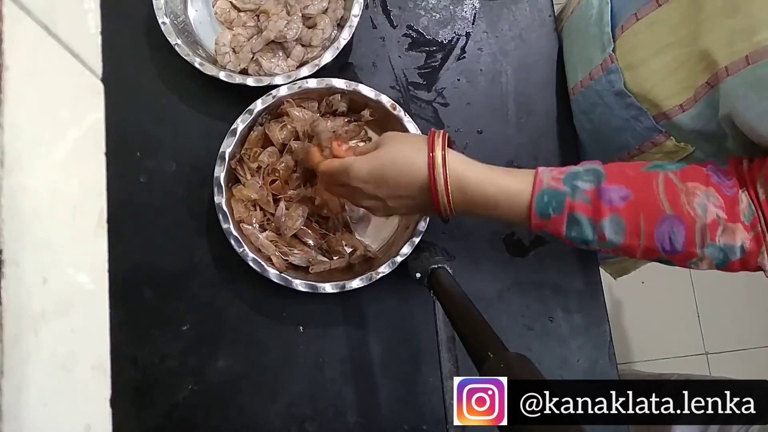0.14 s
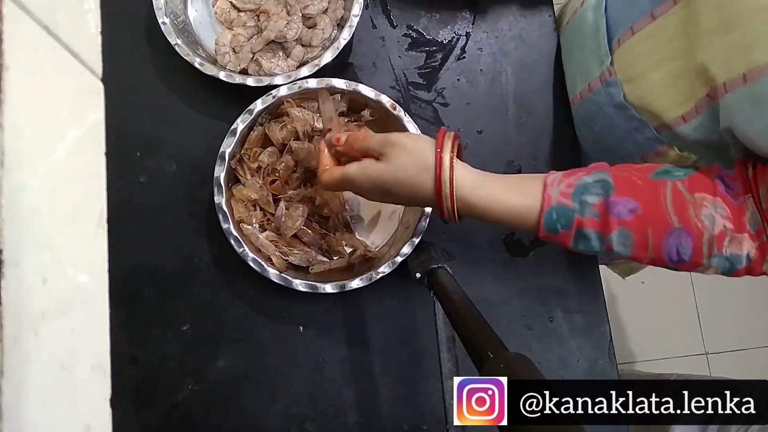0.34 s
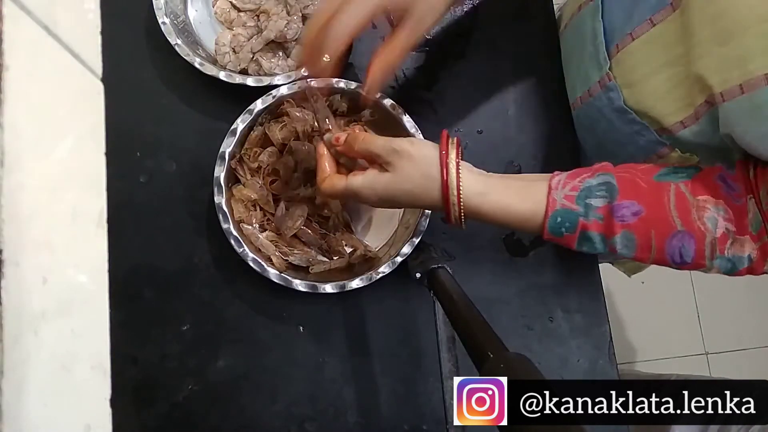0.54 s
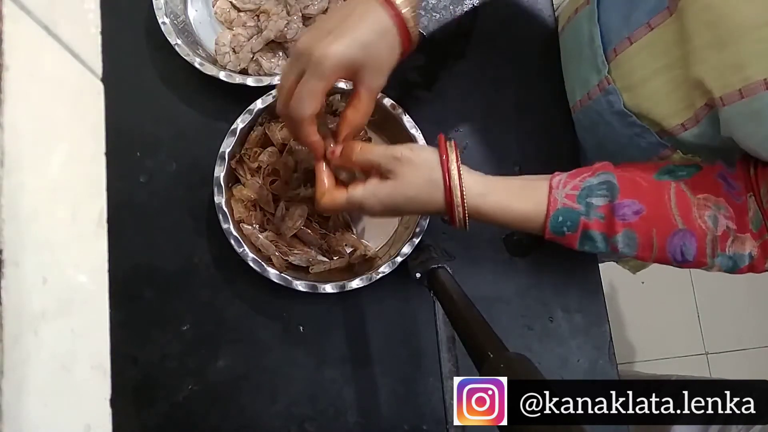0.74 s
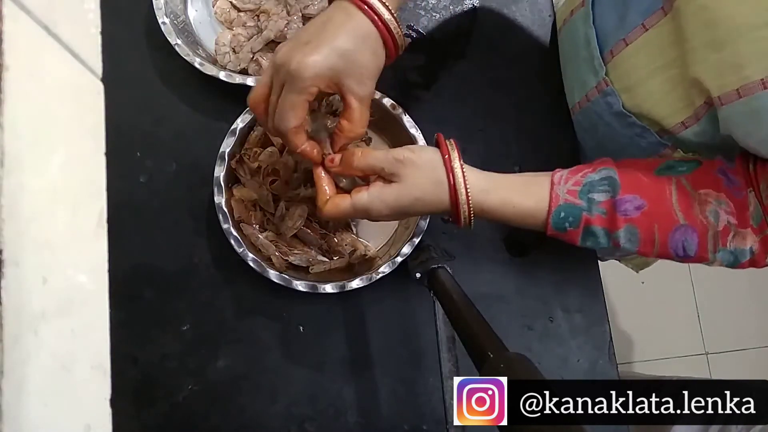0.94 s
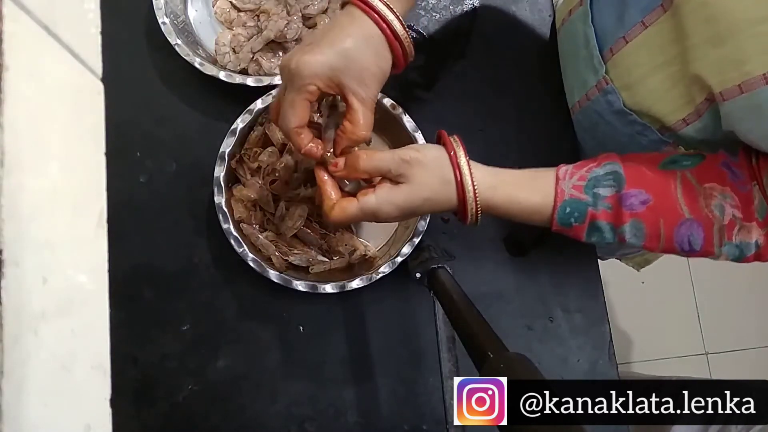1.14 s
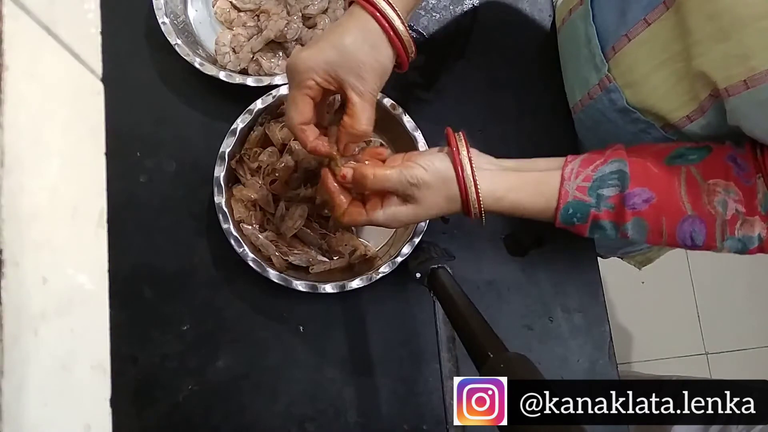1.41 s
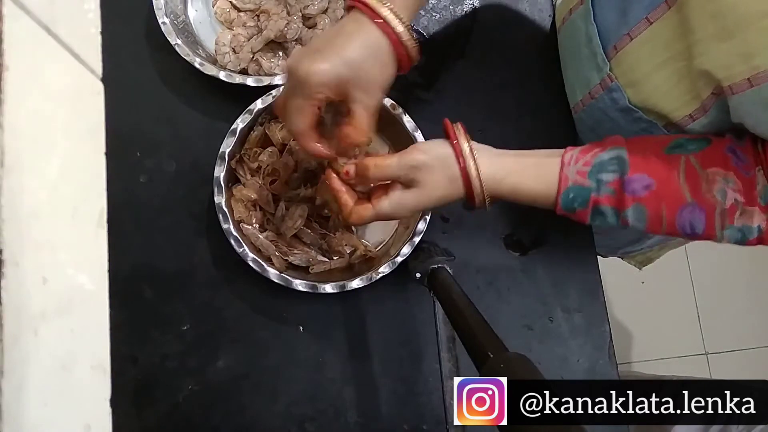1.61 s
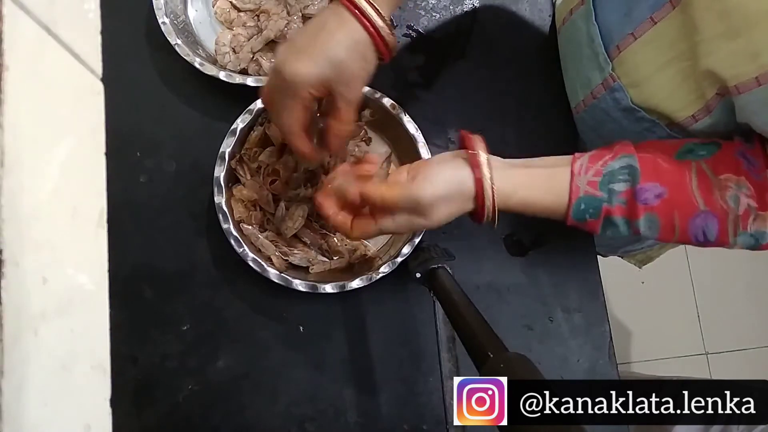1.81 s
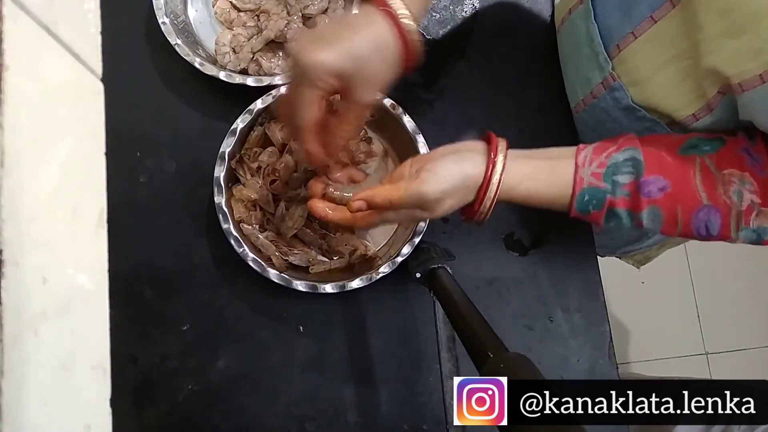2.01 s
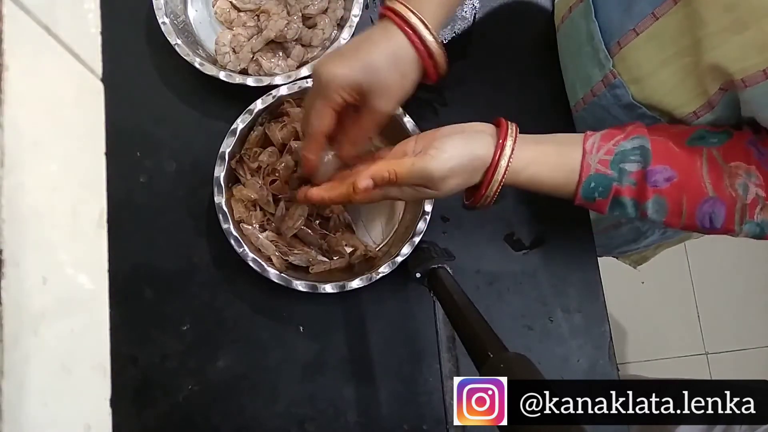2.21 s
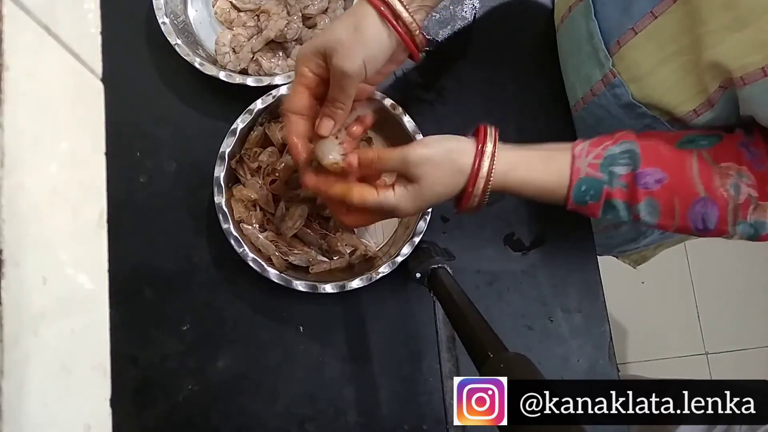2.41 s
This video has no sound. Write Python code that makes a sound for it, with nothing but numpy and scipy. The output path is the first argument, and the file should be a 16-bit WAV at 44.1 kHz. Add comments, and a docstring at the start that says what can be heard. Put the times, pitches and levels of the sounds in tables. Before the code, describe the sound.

Raw prawns peeled by hand, shells snapping and rubbing wetly as bangles clink and steel clanks once

```python
"""Raw prawns are peeled by hand over a steel pan in a hard-walled kitchen, while a motor hums and throbs.
Bangles clink on the wrists, steel clanks once, chatters and rings on, and a faint squeal rises far off.
Bangles clink again over a dull scuff; then come most shell snaps, amid wet rubbing, and a second squeal.
Late on a thin whine comes in, a bangle taps hard and the last clinks follow.
Contacts are bursts of tiny slips that tick and ring a body; the tones are sines, the air shaped noise."""
import sys
import numpy as np
from scipy import signal
from scipy.fft import rfft, irfft
from scipy.io import wavfile

SR = 44100
rng = np.random.default_rng(int(sys.argv[2]) if len(sys.argv) > 2 else 0)


def wrap_up_sound(samples):
    """Save the sound to the file named by the first command line argument, as 16-bit audio."""
    columns = np.atleast_2d(samples).T
    # keep every value between -1 and 1, then stretch to whole-number steps
    tamed = np.clip(columns, -1, 1)
    steps = np.round(tamed * 32767).astype(np.int16)
    wavfile.write(sys.argv[1], SR, steps)


N = 112454
T = np.arange(N) / SR

# Steel is struck and chatters: start_s, level_db, room_db (re direct), contact_s, tilt_db_per_octave
STEEL_BLOWS = [(0.2015, -6.5, 5.5, 0.0081, 0.5), (0.2105, -3.5, -3, 0.0092, 2.5),
               (0.226, -12, 2, 0.015, -1), (0.253, -22, 2, .003, -2), (0.287, -20.5, 7, 0.0027, 1.5),
               (0.312, -26, -2, .002, 2), (0.3371, -17.5, 0, 0.003, 2), (0.355, -29, 1, .003, 2),
               (0.397, -30, 0, .002, 2), (0.4224, -27.5, -2.5, 0.003, 3.5)]
# Loudness of wet shell rubbed between the fingers: time_s, level_db
RUB_LEVEL = [(0, -77), (.2, -74), (.5, -67), (.62, -73), (.9, -63), (.97, -76), (1.04, -54.5), (1.08, -64),
             (1.15, -78.5), (1.58, -89), (1.64, -71), (1.9, -69), (2.1, -61), (2.21, -65), (2.35, -63.5),
             (2.55, -57.5)]


def from_db(db):
    """Decibels to gain."""
    return 10 ** (np.asarray(db) / 20)


def rms_one(x):
    """Scale to rms 1."""
    return x / np.sqrt(np.mean(x ** 2) + 1e-20)


def energy_one(x):
    """Scale to energy 1."""
    return x / np.sqrt(np.sum(x ** 2) + 1e-20)


def in_time(rows):
    """The columns of a curve at every sample."""
    seconds, *columns = np.transpose(rows)
    return [np.interp(T, seconds, column) for column in columns]


def at_hz(points, hz):
    """Read a table on a log-frequency axis."""
    table_hz, values = np.transpose(points)
    return np.interp(np.log(np.maximum(hz, 1)), np.log(table_hz), values)


def pan(db):
    """Gains that lean to the left."""
    return from_db([[db], [-db]])


def drift(rate_hz):
    """Slow chance of spread 1: noise through two equal poles, made at a twentieth of the sample rate."""
    pole = np.exp(-40 * np.pi * rate_hz / SR)
    noise = rng.standard_normal(N // 20 + 2002)
    slow = signal.lfilter([1], [1, -2 * pole, pole * pole], noise)[2000:]  # drop the run-in
    return np.interp(np.arange(N) / 20, np.arange(len(slow)), rms_one(slow))


def tick(colour, size=2048):
    """The shortest causal click with this spectrum (minimum phase, by folding the cepstrum)."""
    level_db = at_hz(colour, np.fft.rfftfreq(size, 1 / SR))
    cepstrum = irfft(np.log(from_db(level_db)))
    cepstrum[1:size // 2] *= 2
    cepstrum[size // 2 + 1:] = 0
    return energy_one(irfft(np.exp(rfft(cepstrum))))


def slips(rate_per_s, spread_db, size):
    """Random tiny clicks of uneven strength and sign."""
    happens = rng.random(size) < rate_per_s / SR
    sign = rng.choice([-1, 1], size)
    strength_db = spread_db * np.minimum(rng.exponential(1, size), 3)
    return happens * sign * from_db(strength_db)


def body_ring(modes, t, tilt_db, detune):
    """A struck body's dying partials, each with a random phase and slightly uneven level and pitch."""
    mode_spread_db = 1.5
    ring = 0
    for hz, level_db, t60_s in modes:
        partial_db = level_db + tilt_db * np.log2(hz) + rng.normal(0, mode_spread_db)
        pitch_hz = hz * (1 + detune * rng.normal())
        partial = np.sin(2 * np.pi * (pitch_hz * t + rng.random()))
        ring = ring + from_db(partial_db - 60 * t / t60_s) * partial
    return ring


def contacts(events, colour, modes=(), ring_db=0, detune=0, slips_per_s=7000):
    """Each contact is a dying burst of slips that ticks and rings the body; gives direct sound and room feed."""
    slip_spread_db, rise_s = 3, 0.0005
    out, t = np.zeros((2, N + SR)), T[:SR // 2]
    for start_s, level_db, room_db, length_s, tilt_db in events:
        tilt_db = np.clip(tilt_db, -2.5, 3.5)  # keeps the tone from growing too dull or sharp
        click = tick([(hz, db + tilt_db * np.log2(hz)) for hz, db in colour])
        burst = slips(slips_per_s, slip_spread_db, len(t)) * (1 - np.exp(-t / rise_s))
        force = np.exp(-t / max(length_s, 1e-4))
        sound = energy_one(signal.fftconvolve(burst * force, click)[:len(t)])
        if len(modes):
            # the ring swells as the contact lets go
            ring = energy_one(body_ring(modes, t, tilt_db, detune) * (1 - force))
            sound = energy_one(sound + from_db(ring_db) * ring)
        start = int(start_s * SR)
        out[:, start:start + len(t)] += from_db([[level_db], [level_db + room_db]]) * sound
    return out[:, :N]


def shell_snaps():
    """Brittle shell tears in short bursts of slips, with no ring."""
    # Snaps: start_s, level_db, room_db (re direct), tear_s, tilt_db_per_octave
    snaps = [(0.5332, -39, -19, 0.0012, 5), (0.9018, -18, -2.5, 0.00087, -1),
             (0.9901, -16, -2, 0.0059, 3.5), (1.0288, -14, -6, 0.0005, 2), (1.0505, -16, -2, 0.003, -1.5),
             (1.2326, -25, 4, 0.0014, 0.5), (1.2765, -35.5, 3.5, 0.0012, 8), (1.9081, -40, 3, .002, 3.5),
             (1.9245, -25, 8, 0.0055, -5), (2.0617, -33.5, 4.5, 0.0048, -2.5),
             (2.124, -46, -26, 0.0037, -2)]
    # Spectrum of tearing shell: pitch_hz, level_db
    shell_colour = [(300, -13.5), (1200, -22), (2400, -14.5), (4000, -11.5), (6500, -8), (10000, 6),
                    (13000, 6.5), (15500, -8.5)]
    return contacts(snaps, shell_colour)


def rubbing():
    """Fine crackle of wet shell between the fingers: dense random slips under a wavering level."""
    # Spectrum of the crackle: pitch_hz, level_db
    rub_colour = [(500, -35), (2000, -5), (2800, -28.5), (4500, -17.5), (6300, -13), (8500, 4.5),
                  (11500, 10), (15500, -0.5)]
    crackles_per_s, crackle_spread_db = 1500, -5.5
    level_db, = in_time(RUB_LEVEL)
    gain = from_db(level_db + 2 * drift(37))
    crackle = signal.fftconvolve(slips(crackles_per_s, crackle_spread_db, N), tick(rub_colour))[:N]
    return gain * rms_one(crackle)


def squelch():
    """Tiny bubbles burst in the wet flesh as it is rubbed, each a dying sine at one of 24 pitches."""
    bubbles_per_s, spread_db = 110, 4  # the rate is for all pitches together
    below_rub_db, ring_cycles = -16.5, 150  # a bubble falls by 60 dB in these cycles
    level_db, = in_time(RUB_LEVEL)
    pitches_hz, t, out = np.geomspace(3000, 7500, 24), T[:SR // 10], 0
    for hz in pitches_hz:
        bubble = energy_one(from_db(-60 * t * hz / ring_cycles) * np.sin(2 * np.pi * hz * t))
        bursts = slips(bubbles_per_s / len(pitches_hz), spread_db, N)
        out = out + hz * signal.fftconvolve(bursts, bubble)[:N]  # higher bubbles are louder
    return from_db(level_db + below_rub_db) * rms_one(out)


def bangle_clinks():
    """Bangles touch and ring at pitches that differ a little each time."""
    # Clinks: start_s, level_db, room_db (re direct), contact_s, tilt_db_per_octave
    clinks = [(0.0383, -24, 7.5, 0.006, 3.5), (0.6654, -21.5, 8.5, 0.0097, 1.5),
              (0.6955, -9.5, 6.5, 0.0024, 3.5), (0.702, -6, -19, 0.021, 4.5),
              (0.731, -24, 9.5, 0.0061, 2.5), (1.3683, -30.5, 3.5, 0.0027, -1),
              (1.6192, -40, 9.5, 0.0082, 5), (1.6407, -34, 6, 0.0097, 10.5), (1.657, -30, -24, 0.0054, 16),
              (1.703, -27.5, 6, 0.0022, 2.5), (1.7709, -30, 3, 0.00068, 3.5), (1.8292, -30.5, 9, 0.0012, 6),
              (1.8447, -30, 1, 0.0033, -6), (2.2378, -17, 0.5, 0.0046, 4), (2.2578, -12, -2, 0.001, 0.5),
              (2.285, -26.5, 6, 0.0081, 9), (2.4872, -23.5, 6.5, 0.0022, 0.5), (2.5152, -24, 4, 0.0016, -6)]
    # Ringing modes of a bangle: pitch_hz, level_db, t60_s
    bangle_modes = [(4235, -7.5, 0.07), (5754, 2.5, 0.032), (8160, -5.5, 0.21), (11020, 8.5, 0.093),
                    (11000, 15.5, 0.036), (11800, 6.5, 0.016), (13200, 5.5, 0.11)]
    # Spectrum of the touch: pitch_hz, level_db
    bangle_colour = [(400, -42), (1000, -30), (3000, -37), (4300, -13.5), (5200, -11.5), (5800, -19.5),
                     (6500, -13), (8000, 2.5), (10000, 2.5), (11200, 12.5), (13000, 3.5), (14300, -6),
                     (15500, -11)]
    return contacts(clinks, bangle_colour, bangle_modes, ring_db=-4, detune=0.004)


def bangle_tap():
    """One hard tap of a bangle, in which the ring outweighs the touch."""
    # The tap: start_s, level_db, room_db (re direct), contact_s, tilt_db_per_octave
    taps = [(2.0178, -5, -9, 0.0034, 1)]
    # Modes that the tap rings: pitch_hz, level_db, t60_s
    tap_modes = [(4983, -32, 0.19), (5660, -24, .03), (9480, 0, 0.039), (10820, 7, 0.016),
                 (11030, 10.5, 0.022), (15050, 1, 0.018)]
    # Spectrum of the touch: pitch_hz, level_db
    tap_colour = [(1000, -26), (4000, -28), (5400, -22), (8400, -8.5), (9400, -7), (10000, -6), (11000, -4),
                  (12000, 3), (14000, -23), (15300, -22)]
    return contacts(taps, tap_colour, tap_modes, ring_db=11)


def steel_clank():
    """Blows and chatter on steel, as bursts of slips; the long ring is made apart."""
    # Spectrum of the blows: pitch_hz, level_db
    steel_colour = [(150, -15.5), (330, -3), (700, -12), (1300, -13), (2200, -11), (2600, -19), (3400, -26),
                    (4400, -17), (6000, -11), (8000, -3), (9700, 0), (12000, -3), (14000, -10),
                    (15500, -21)]
    return contacts(STEEL_BLOWS, steel_colour)


def steel_ring():
    """The steel rings on after the first blow; each partial has its own phase shift between the sides."""
    # Modes of the steel: pitch_hz, level_db, t60_s
    steel_modes = [(863, -48, 0.57), (1069, -55.5, 0.65), (1232, -60, 1), (1598, -44, 0.19),
                   (1917, -47.5, 0.71), (2068, -45, .35), (2164, -45, 0.37), (2184, -46, 0.51),
                   (2495, -51, 0.178), (2835, -52, 0.58), (2963, -40, 0.39), (3077, -36.5, 0.29),
                   (3655, -60.5, 0.59), (3790, -49.5, 0.6), (4016, -48.5, 0.21), (4395, -45, .22),
                   (4480, -43.5, 0.41), (4500, -42.5, 0.17), (4850, -47, 0.38), (5174, -48.5, 0.224),
                   (5240, -45, 0.41), (5660, -50, 0.17), (6280, -45, 0.098), (6400, -39, 0.094),
                   (6853, -40, .14), (7720, -37, 0.135), (8300, -40, .14), (9337, -29.5, .15),
                   (10100, -27, 0.079), (10100, -39.5, 0.45)]
    ring_db, pan_db, rise_s, side_phase_rad = 2, 2, 0.008, 1.2
    t = np.maximum(T - STEEL_BLOWS[0][0], 0)
    ring = 0
    for hz, level_db, t60_s in steel_modes:
        side_phase = side_phase_rad * rng.choice([-1, 1]) * np.array([[0], [1]])
        partial = np.sin(2 * np.pi * (hz * t + rng.random()) + side_phase)
        ring = ring + from_db(level_db - 60 * t / t60_s) * partial
    return from_db(ring_db) * pan(pan_db) * ring * (1 - np.exp(-t / rise_s))


def scuffs():
    """Something is shifted: sparse slips excite low modes whose pitches vary from scuff to scuff."""
    # Scuffs: start_s, level_db, room_db (re direct), length_s, tilt_db_per_octave
    shifts = [(0.674, -33, 11.5, 0.0094, 7), (0.688, -26, 6, 0.013, 0), (0.775, -23.5, 5.5, 0.0088, -2),
              (0.794, -31, -0.5, 0.017, -4.5), (0.826, -30, -3, 0.029, -2), (0.866, -35.5, 4, 0.0067, -2),
              (0.899, -28.5, 2.5, 0.006, -1), (1.926, -37.5, 0, 0.008, -3)]
    # Modes of the shifted thing: pitch_hz, level_db, t60_s
    scuff_modes = [(387, 2, 0.047), (611, -8.5, 0.22), (760.4, -1.5, 0.17), (896, -10.5, 0.086),
                   (1036, -1.5, 0.092), (2008, -2, 0.057)]
    # Spectrum of the scrape: pitch_hz, level_db
    scuff_colour = [(120, -6.5), (400, 1), (900, -3), (1500, -3), (2600, -6), (4000, -13.5), (8000, -18),
                    (15000, -10.5)]
    return contacts(shifts, scuff_colour, scuff_modes, ring_db=-6, detune=0.06, slips_per_s=1800)


def far_squeal():
    """A rough gliding tone with its octave; fast pitch jitter makes the roughness."""
    # Squeals: time_s, pitch_hz, level_db, octave_level_db
    squeal = [(0.02, 1350, -77.5, -88), (0.12, 1406, -79.5, -109), (0.18, 1546, -57.5, -87),
              (0.23, 1648, -82, -100), (0.46, 1816, -75, -100), (0.55, 1858, -68.5, -109),
              (0.66, 1806, -80, -104), (0.75, 1875, -100, -110), (1.215, 1198, -105, -105),
              (1.235, 1185, -70.5, -66.5), (1.35, 1276, -65.5, -76), (1.44, 1392, -59, -71.5),
              (1.51, 1385, -73.5, -78.5), (1.58, 1428, -70, -79.5), (1.68, 1439, -75, -98.5),
              (1.88, 1413, -83.5, -105), (2.0, 1406, -100, -110)]
    jitter_share, jitter_hz = 0.04, 260
    hz, level_db, octave_db = in_time(squeal)
    rough_hz = hz * (1 + jitter_share * drift(jitter_hz))
    phase = 2 * np.pi * np.cumsum(rough_hz) / SR
    return np.sqrt(2) * (from_db(level_db) * np.sin(phase) + from_db(octave_db) * np.sin(2 * phase))


def whine():
    """Two thin, high tones that waver in level and phase."""
    # The tones: pitch_hz, level_db (re the curve below)
    whine_tones = [(3450, 4), (3240, -5.5)]
    # Loudness of the whine: time_s, level_db
    whine_level = [(0, -115), (1.42, -110), (1.52, -94.5), (2.08, -81.5), (2.17, -83), (2.42, -82.5),
                   (2.55, -84)]
    waver_hz = 27
    level_db, = in_time(whine_level)
    out = 0
    for hz, db in whine_tones:
        waver = drift(waver_hz) + 1j * drift(waver_hz)
        out = out + from_db(level_db + db) * np.real(waver * np.exp(2j * np.pi * hz * T))
    return out


def motor():
    """A wavering hum and a higher tone that throbs about four times a second, swelling together."""
    # Steady hum tones: pitch_hz, level_db (before the swell), waver_share
    hum_tones = [(97.93, -54, 0.076), (157.3, -62, 0.22)]
    # Swell of the whole motor: time_s, level_db
    motor_swell = [(0, 5), (.6, -7.5), (1.0, 2.5), (1.2, 0), (1.6, 1), (2.0, 2), (2.55, -0.5)]
    throb_hz, throb_db = 220.2, -59  # level before the swell
    throb_period_s, throb_peak_s = 0.265, 1.58
    hum = 0
    for hz, level_db, waver_share in hum_tones:
        waver = 1 + waver_share * (drift(4.4) + 1j * drift(8.3))
        hum = hum + from_db(level_db) * np.real(waver * np.exp(2j * np.pi * hz * T))
    throb = np.cos(np.pi * (T - throb_peak_s) / throb_period_s) ** 4
    throb_tone = np.sin(2 * np.pi * throb_hz * T + drift(4.2))
    swell_db, = in_time(motor_swell)
    return np.sqrt(2) * from_db(swell_db) * (hum + from_db(throb_db) * throb * throb_tone)


def room_air():
    """Low rumble: shaped noise, alike at both sides in the bass."""
    # Spectrum of the rumble: pitch_hz, level_db
    air_colour = [(25, 2), (45, -9.5), (62, -7.5), (85, 6), (130, 5.5), (175, 0), (260, -9), (450, -12),
                  (700, -21), (1100, -31), (2000, -37.5), (2800, -52.5), (4000, -46.5), (8000, -55),
                  (16000, -62.5)]
    # Loudness of the rumble: time_s, level_db
    air_level = [(0, -54), (.55, -55.5), (.85, -50.5), (1.3, -53.5), (1.7, -50.5), (2.2, -54), (2.55, -59)]
    # Left-right likeness: pitch_hz, correlation (0 to 1)
    likeness = [(30, 0.72), (100, 1), (200, 1), (400, 0.24), (1000, 0.079), (3000, .05)]
    hz = np.fft.rfftfreq(N, 1 / SR)
    mid, side = rfft(rng.standard_normal((2, N))) * from_db(at_hz(air_colour, hz)) * (hz > 15)
    alike = np.clip(at_hz(likeness, hz), 0, 1)
    both_sides = np.sqrt(1 + alike) * mid + np.sqrt(1 - alike) * side * [[1], [-1]]
    level_db, = in_time(air_level)
    return from_db(level_db) * rms_one(irfft(both_sides, N))


def kitchen(x):
    """Diffuse reverberation, different at each side, from bands of noise that die sooner in the treble."""
    # Decay of the room: pitch_hz, t60_s
    room_t60 = [(200, 0.58), (1000, 0.65), (4000, 0.51), (8000, 0.23), (15000, 0.16)]
    build_s = 0.001
    t, edges_hz = T[:SR], np.geomspace(60, 18000, 13)
    noise, hz = rfft(rng.standard_normal((2, SR))), np.fft.rfftfreq(SR, 1 / SR)
    tail = 0
    for low, high in zip(edges_hz, edges_hz[1:]):
        band = irfft(noise * ((hz >= low) & (hz < high)))
        t60_s = at_hz(room_t60, np.sqrt(low * high))
        tail = tail + band * np.exp(-np.log(1000) * t / t60_s)
    tail = np.sqrt(2) * energy_one(tail * (1 - np.exp(-t / build_s)))
    return signal.fftconvolve(x[None], tail, axes=1)[:, :N]


def later(x, lag_s):
    """Delay by a fraction of a sample or more, as a phase slope."""
    hz = np.fft.rfftfreq(N, 1 / SR)
    return irfft(rfft(x) * np.exp(-2j * np.pi * hz * lag_s), N)


def scene():
    """Hands and pan to the left, reaching the right side a little later, in the ringing kitchen."""
    direct, feed = shell_snaps() + bangle_clinks() + bangle_tap() + steel_clank() + scuffs()
    rub = rubbing()
    near = direct + 0.23 * rub + squelch()
    near_sides = pan(5) * np.array([near, later(near, 0.00005)])
    room = pan(2.5) * kitchen(feed + rub + far_squeal() + whine())  # squeal and whine come by the room alone
    background = pan(2) * (motor() + room_air())
    return near_sides + steel_ring() + room + background


def record(dry):
    """A steep elliptic low-pass cuts the top above 16.2 kHz."""
    top_cut = signal.ellip(10, 0.2, 80, 16200, fs=SR, output="sos")  # order, ripple dB, stop dB, Hz
    return signal.sosfilt(top_cut, dry)


dry = scene()
out = record(dry)
wrap_up_sound(out)
```